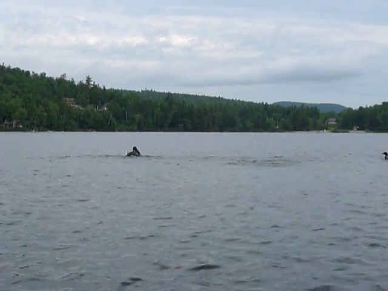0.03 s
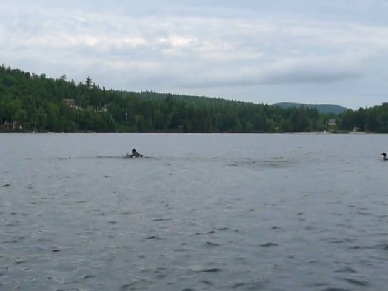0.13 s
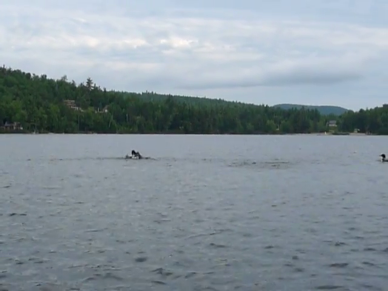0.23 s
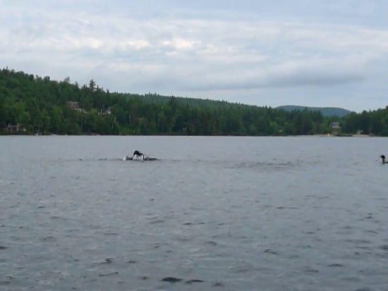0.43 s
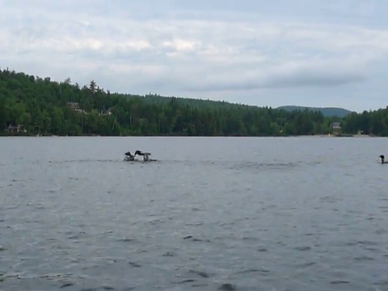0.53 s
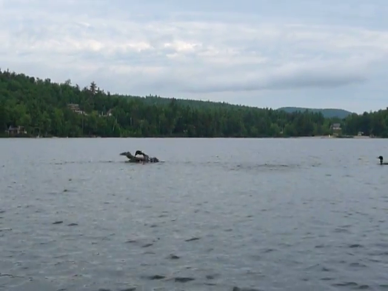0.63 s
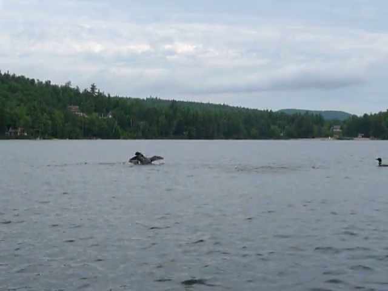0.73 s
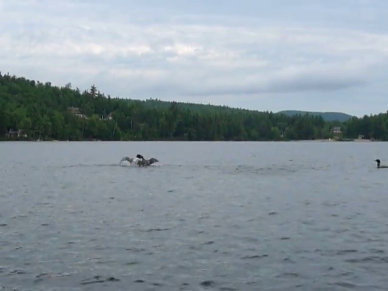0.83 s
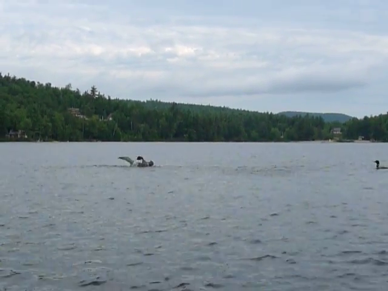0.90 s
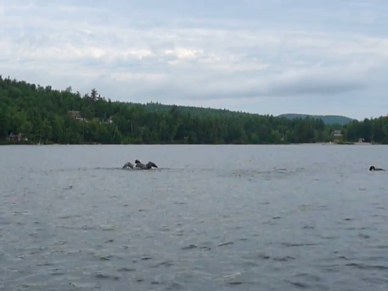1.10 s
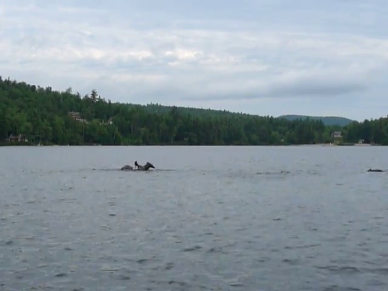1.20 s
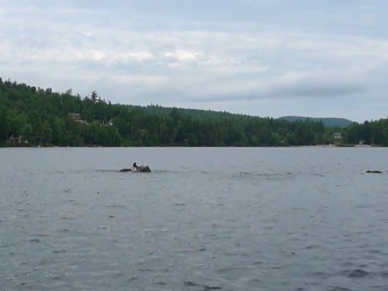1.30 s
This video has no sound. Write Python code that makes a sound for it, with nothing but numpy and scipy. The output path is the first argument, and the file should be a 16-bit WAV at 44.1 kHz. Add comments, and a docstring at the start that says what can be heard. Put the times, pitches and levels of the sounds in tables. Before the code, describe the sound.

A loon gives one quick, wavering call on an open lake, a reedy low note breaking upward into five pulses with a faint echo. Wind buffets the microphone over a soft wash of small waves.

```python
"""Loon tremolo on a windy lake

A loon gives one quick tremolo on open water: a low, reedy opening note breaks upward into five
wavering arches, with faint lower tones sounding under them. The wooded shore sends back a faint,
smeared echo. Wind buffets the microphone over the wash of small waves and a trace of recorder hiss."""
import sys
import numpy as np
from scipy import signal
from scipy.fft import rfft, irfft
from scipy.io import wavfile
from scipy.ndimage import uniform_filter1d

SR = 44100
rng = np.random.default_rng(int(sys.argv[2]) if len(sys.argv) > 2 else 0)


def master_out(mix):
    """Clip the mix to full scale and print it as 16-bit PCM to the path in sys.argv[1]."""
    frames = np.transpose(np.atleast_2d(mix))
    ceiling = np.clip(frames, -1, 1)
    pcm = np.round(ceiling * 32767).astype(np.int16)
    wavfile.write(sys.argv[1], SR, pcm)


N = 59535
T = np.arange(N) / SR


def from_db(db):
    """Decibels to gain."""
    return 10 ** (np.asarray(db) / 20)


def unit_rms(x):
    """Scale to rms 1."""
    return x / np.sqrt(np.mean(x ** 2) + 1e-20)


def automation(rows):
    """Breakpoints (time first) to one curve per remaining column."""
    times, *columns = np.transpose(rows)
    return [np.interp(T, times, column) for column in columns]


def filtered(x, hz, kind="low", order=2):
    """Butterworth filter."""
    return signal.sosfilt(signal.butter(order, hz, kind, fs=SR, output="sos"), x)


def drift(hz):
    """Random wander up to the given rate, rms 1."""
    return unit_rms(filtered(rng.standard_normal(2 * N), hz)[N:])


def coloured_noise(eq):
    """Noise through an EQ curve, rms 1."""
    hz, db = np.transpose(eq)
    bins_hz = np.maximum(np.fft.rfftfreq(N, 1 / SR), 1)
    gain = from_db(np.interp(np.log(bins_hz), np.log(hz), db))
    return unit_rms(irfft(rfft(rng.standard_normal(N)) * gain, N))


# Tone of the gusts and of the rumble under them: freq_hz, gain_db
GUST_EQ = [(25, -21), (50, -5), (80, -1.5), (120, 3), (160, 0), (230, 1.5), (330, -10.5), (500, -16.5),
           (750, -33.5), (1500, -47.5), (4000, -66.5)]
RUMBLE_EQ = [(15, -4), (40, -6), (70, 0), (110, -1), (200, -9), (320, -26), (800, -55)]
# Their fader moves: time_s, level_db
GUST_LEVELS = [(0, -39.5), (.022, -33), (.032, -35), (.05, -41), (.09, -43.5), (.099, -36), (.135, -37.5),
               (.18, -53), (.205, -44), (.217, -32), (.235, -38), (.26, -28), (.272, -21.5), (.292, -19),
               (.306, -29.5), (.335, -37), (.38, -39), (.398, -26.5), (.42, -36), (.435, -19.5),
               (.455, -33.5), (.484, -24), (.514, -26), (.53, -44.5), (.572, -31), (.595, -44.5),
               (.668, -55.5), (.686, -30), (.725, -48), (.748, -28.5), (.795, -39), (.82, -32),
               (.846, -40.5), (.862, -55), (1.03, -63), (1.065, -55), (1.09, -52), (1.19, -55.5),
               (1.23, -60.5), (1.35, -61)]
RUMBLE_LEVELS = [(0, -45), (.5, -47.5), (.83, -41), (.9, -57), (1.35, -57)]
# Sharp pops on the microphone: centre_s, peak_db, width_s
BUFFETS = [(.027, -31.5, 0.0015), (0.1, -29, .0012), (.435, -17.5, 0.00046), (.476, -17.5, 0.00046),
           (.483, -18, 0.00023), (.516, -18.5, .0005), (.574, -28.5, 0.00032), (.689, -29.5, 0.00037),
           (.748, -30, 0.00064), (1.069, -37, 0.001)]


def wind():
    """Turbulence at the microphone: low gusts over a deep rumble, with a few sharp pressure pulses."""
    eddies = coloured_noise(GUST_EQ)
    eddies /= np.sqrt(uniform_filter1d(eddies ** 2, int(0.022 * SR)) + 1e-9)  # level out over 22 ms
    gusts = from_db(automation(GUST_LEVELS)[0]) * eddies
    rumble = from_db(automation(RUMBLE_LEVELS)[0]) * coloured_noise(RUMBLE_EQ)
    pulses = np.zeros(N)
    for centre_s, peak_db, width_s in BUFFETS:
        offset = (T - centre_s) / width_s
        pulses += from_db(peak_db) * (1 - offset ** 2 / 2) * np.exp(-offset ** 2 / 4)
    return gusts + rumble + pulses


# Tone of the wash: freq_hz, gain_db
WASH_EQ = [(100, 7.5), (300, -0.5), (600, 1.5), (950, 3), (1500, -5.5), (2200, -9), (3200, -9),
           (4200, -26.5), (8000, -49)]
# Level of the background wash, which drops almost to silence near 0.6 s: time_s, level_db
WASH_LEVELS = [(0, -45.5), (.12, -49), (.2, -51.5), (.5, -47.5), (.6, -63), (.65, -65.5), (.69, -37),
               (.75, -49.5), (.81, -39), (.87, -47.5), (.95, -49.5), (1.1, -50), (1.35, -51)]
# Water ticks and splashes: start_s, level_db, low_hz, high_hz, t60_s
SPLASHES = [(0.078, -46.5, 2100, 3150, 0.027), (.416, -30.5, 2300, 3285, 0.01),
            (0.513, -35.5, 500, 2900, .016), (0.679, -48, 450, 3316, 0.12),
            (1.071, -51.5, 2800, 3500, 0.022)]


def water():
    """Small waves make a bed of noise, dotted with short ticks and splashes."""
    out = from_db(automation(WASH_LEVELS)[0]) * coloured_noise(WASH_EQ)
    for start_s, level_db, low_hz, high_hz, t60_s in SPLASHES:
        envelope = from_db(level_db - 60 * np.abs(T - start_s) / t60_s) * (T >= start_s)
        burst = rng.standard_normal(N) * envelope + 1e-18
        band = filtered(filtered(burst, high_hz, order=12), low_hz, "high", order=4)
        out += band * np.sqrt(SR / 2 / (high_hz - low_hz))  # make-up gain for the narrow band
    return out


def gate(start_s, end_s, edge_s=0.0025):
    """Switch a voice on and off with soft edges."""
    return .25 * (1 + np.tanh(2 * (T - start_s) / edge_s)) * (1 + np.tanh(2 * (end_s - T) / edge_s))


def voice_phase(hz, jitter=0.00079):
    """Running phase of a slightly unsteady voice."""
    return 2 * np.pi * np.cumsum(hz * (1 + jitter * drift(hz=148))) / SR


# Low notes: the loon's reedy low voice, plus two faint short tones near 900 Hz.
# One breakpoint list per note: time_s, pitch_hz, fundamental_db, octave_db, edge_db
LOW_NOTES = [
    [(.334, 669.7, -55.5, -64, -78), (.343, 695, -27, -47, -73), (.350, 723, -32.5, -32, -72),
     (.360, 747, -29, -26.5, -60.5), (.371, 762.3, -27, -28.5, -64.5), (.385, 742.6, -30.5, -28.5, -55),
     (.398, 683, -22.5, -40, -66.5), (.408, 707, -33, -52.5, -73), (.419, 721, -25.5, -32.5, -62.5),
     (.435, 811, -23.5, -25, -44.5), (.443, 865, -23.5, -29, -47.5), (.452, 849, -26.5, -41, -63),
     (.474, 808, -37, -53.5, -74), (.486, 800, -58, -72, -78.5)],
    [(.399, 884, -45.5, -73, -78), (.406, 918, -36, -62.5, -82), (.418, 870, -51, -67.5, -82)],
    [(.607, 900, -50, -65, -82), (.628, 844, -49.5, -63.5, -69.5), (.655, 722, -57, -66, -70)],
    [(.752, 720, -56, -51.5, -68), (.765, 648.4, -29.5, -48.5, -70.5), (.776, 707, -22.5, -50, -40),
     (.786, 722.5, -40.5, -48, -48.5), (.802, 793, -42.5, -52.5, -60)],
    [(.838, 624, -56, -75, -81), (.852, 597.5, -43, -67.5, -83), (.868, 558, -47.5, -74, -87.5),
     (.89, 563, -46, -80.5, -87)],
]
# Top partials that give them edge: harmonic, gain_db (relative to edge_db)
EDGE_PARTIALS = [(4, -1.5), (5, -19), (6, -28.5)]
# Sum and difference tones: high_multiple, low_multiple, gain_db (relative to fundamental_db)
SIDEBANDS = [(1, 1, -11), (2, -1, -1), (1, 2, -24.5), (2, 1, -26.5)]


def low_notes(high_gate, high_phase):
    """Harmonic tones, reedy when the octave is strong; overlap with the high voice adds sidebands."""
    out = np.zeros(N)
    for note in LOW_NOTES:
        pitch_hz, fundamental_db, octave_db, edge_db = automation(note)
        phase = voice_phase(pitch_hz)
        sidebands = sum(from_db(db) * np.sin(j * high_phase + k * phase) for j, k, db in SIDEBANDS)
        body = from_db(fundamental_db) * (np.sin(phase) + high_gate * sidebands)
        reed = from_db(octave_db) * (np.sin(2 * phase) + from_db(-26) * np.sin(3 * phase))
        edge = from_db(edge_db) * sum(from_db(db) * np.sin(k * phase) for k, db in EDGE_PARTIALS)
        out += gate(note[0][0], note[-1][0]) * (body + reed + edge)
    return out


# Overtones of the high voice, before the throat shapes them: harmonic, gain_db
OVERTONES = [(2, -29.5), (3, -32), (4, -48.5)]
# Throat resonances: freq_hz, gain_db
THROAT_EQ = [(1650, -15), (2050, 1), (2400, -14.5), (2600, -11), (2850, 4.5), (3150, -10), (3450, -4),
             (4000, -17.5), (5000, -14.5)]


def throat_overtones(pitch_hz, phase, flicker_db=2.5):
    """Each overtone of the high voice flickers, and swells as it sweeps through a throat resonance."""
    out = np.zeros(N)
    for harmonic, gain_db in OVERTONES:
        throat_db = np.interp(harmonic * pitch_hz, *np.transpose(THROAT_EQ))
        out += from_db(gain_db + throat_db + flicker_db * drift(hz=71)) * np.sin(harmonic * phase)
    return out


# Pitch arches of the tremolo: crest_s, pitch_hz, level_db, half_width_s
ARCHES = [(0.453, 1148, -18.5, 0.044), (0.536, 1180, -17.5, 0.043), (.622, 1188, -17.5, .045),
          (0.708, 1142, -17, 0.038), (.801, 1044, -19.5, 0.036)]
# When the high voice sounds: start_s, end_s
HIGH_SPANS = [(0.447, .764), (.784, .851)]


def high_voice(rest_hz=803.6, glide_s=0.017, sag_loss_db=13, shimmer_db=0.73, brighten_db_per_s=23):
    """A near-pure tone that arches in pitch, loudest on the crests; returns sound, gate and phase."""
    crest_s, crest_hz, crest_db, half_width_s = np.transpose(ARCHES)
    arches = np.maximum(1 - ((T - crest_s[:, None]) / half_width_s[:, None]) ** 2, 0)
    lift_hz = (arches * (crest_hz - rest_hz)[:, None]).max(0)
    glide = int(glide_s * SR)  # rounds the corners between arches
    pitch_hz = rest_hz + uniform_filter1d(lift_hz, glide)
    phase = voice_phase(pitch_hz)
    # The voice weakens as the pitch sags, bottoming out 81% of the way down.
    sag = np.clip(1 - uniform_filter1d(arches.max(0), glide), 0, 1)
    sag_db = -sag_loss_db * np.minimum(sag / 0.81, 1) ** 1.98
    fundamental = from_db(sag_db) * np.sin(phase)
    # The overtones dip less, and grow as the call goes on.
    overtone_db = 0.26 * sag_db + brighten_db_per_s * (T - crest_s.mean())
    overtones = from_db(overtone_db) * throat_overtones(pitch_hz, phase)
    level = from_db(np.interp(T, crest_s, crest_db) + shimmer_db * drift(hz=84))
    sounding = sum(gate(*span) for span in HIGH_SPANS)
    return sounding * level * (fundamental + overtones), sounding, phase


def tremolo_call(rasp_db=-41.5):
    """The loon's high voice mixed with the low notes, roughened by a trace of fast level flutter."""
    high, high_gate, high_phase = high_voice()
    tones = high + low_notes(high_gate, high_phase)
    rasp = 1 + from_db(rasp_db) * drift(hz=596)
    return np.sqrt(2) * tones * rasp


# Tone of the shore's echo: freq_hz, gain_db
SHORE_EQ = [(500, -10.5), (850, -2.5), (1040, -1.5), (1110, 6), (1180, -1), (1400, -2.5), (3000, -11)]


def lake_echo(call, scatter_db=-21, scatter_t60_s=0.25, shore_db=-41.5, shore_t60_s=1.56):
    """Brief scatter off the water, then the long, dull echo of the wooded shore."""
    scatter = rng.standard_normal(N) * from_db(-60 * T / scatter_t60_s)
    since_echo_s = T - 0.44  # pre-delay: to the shore and back
    fade_in = np.clip(since_echo_s / 0.043, 0, 1)
    shore = coloured_noise(SHORE_EQ) * fade_in * from_db(-60 * since_echo_s / shore_t60_s)
    impulse = from_db(scatter_db) * unit_rms(scatter) + from_db(shore_db) * unit_rms(shore)
    return signal.fftconvolve(call, impulse / np.sqrt(N))[:N]


def scene():
    """Mono mix of wind, water, the call and its echo."""
    call = tremolo_call()
    return (wind() + water() + call + lake_echo(call))[None]


def record(dry, hiss_db=-67, whine_db=-77.5, whine_hz=4390, cutoff_hz=8100):
    """A small recorder adds hiss and a thin whine, and cuts the top end."""
    hiss = from_db(hiss_db) * unit_rms(filtered(rng.standard_normal(N), cutoff_hz, order=8))
    whine = from_db(whine_db) * np.sqrt(2) * np.sin(2 * np.pi * whine_hz * T)
    return filtered(dry + hiss + whine, cutoff_hz, order=24)


dry = scene()
out = record(dry)
master_out(out)
```